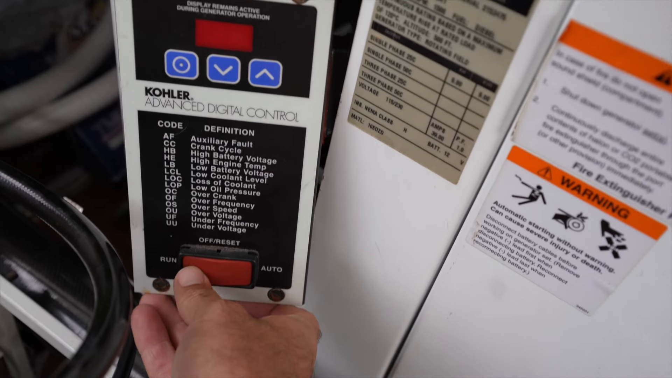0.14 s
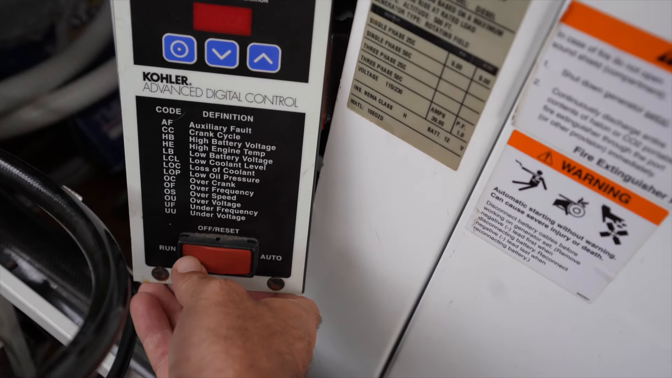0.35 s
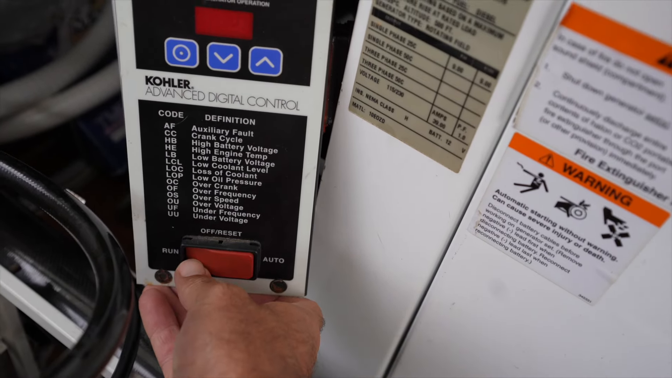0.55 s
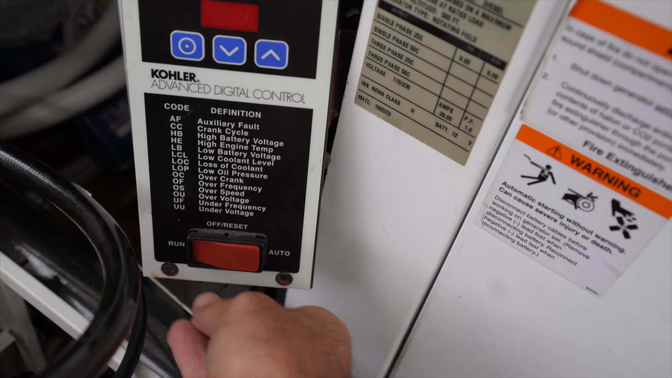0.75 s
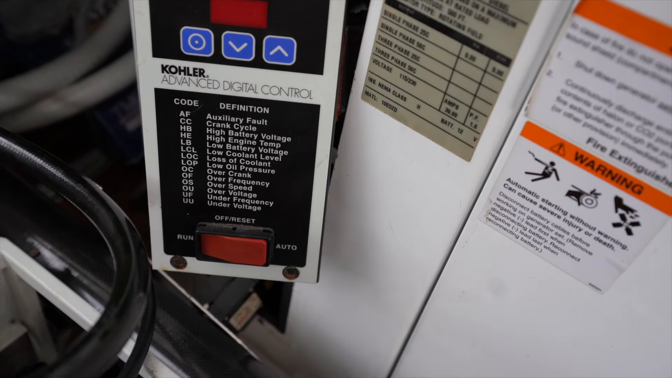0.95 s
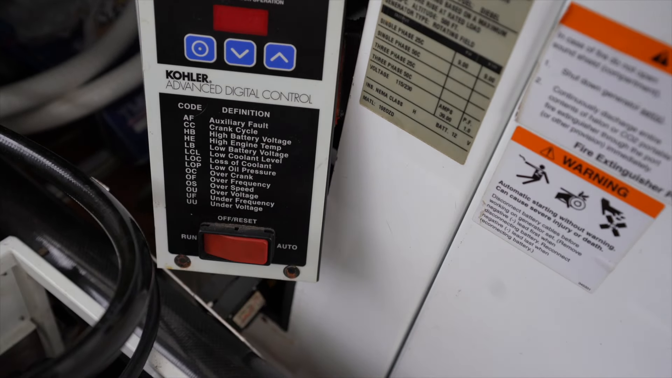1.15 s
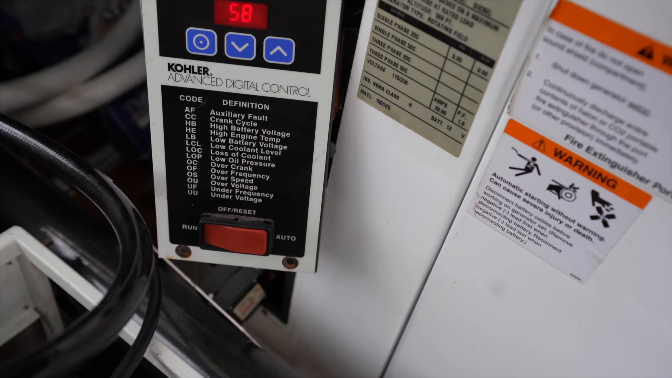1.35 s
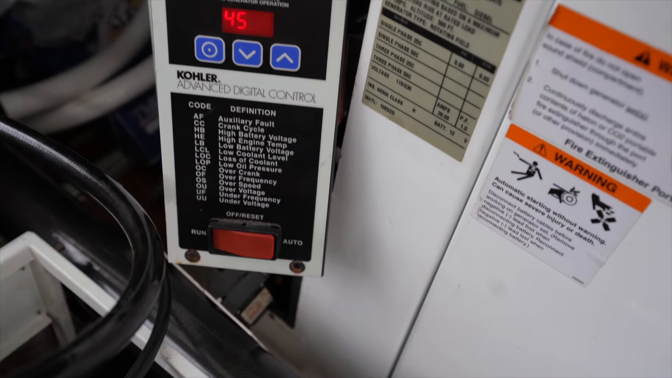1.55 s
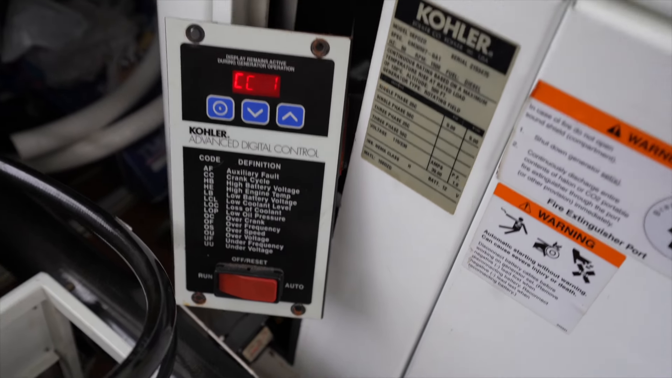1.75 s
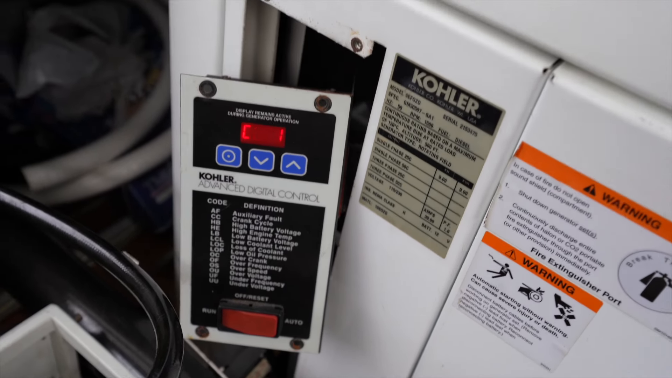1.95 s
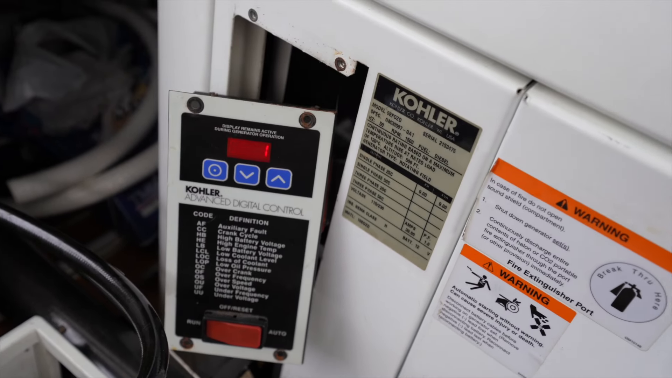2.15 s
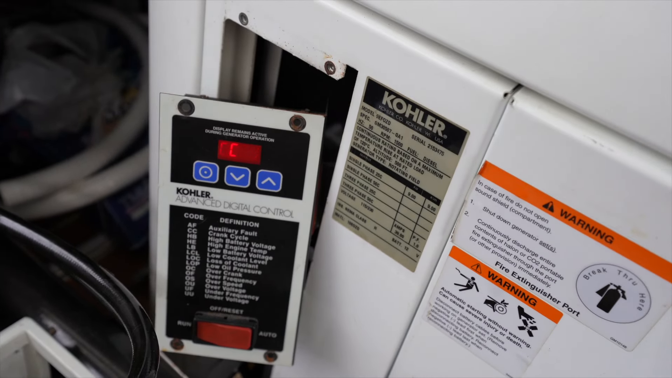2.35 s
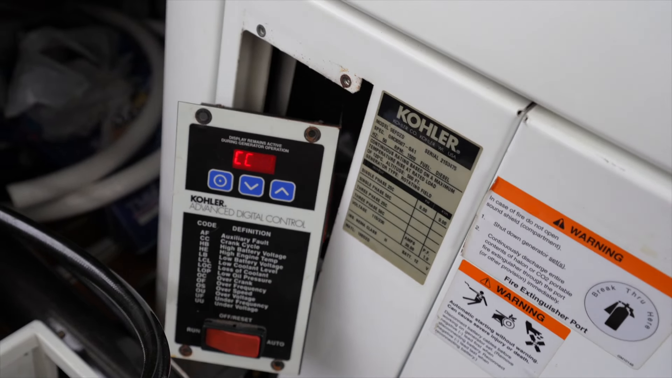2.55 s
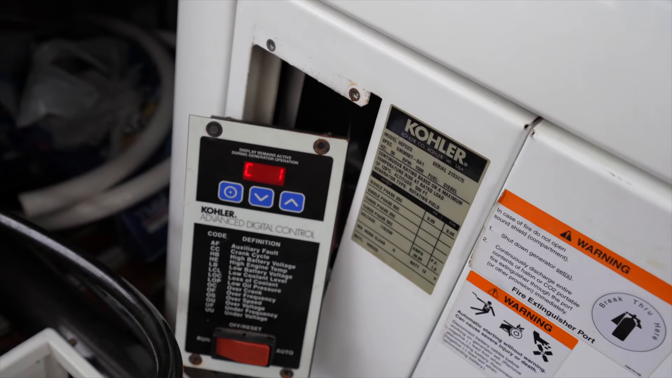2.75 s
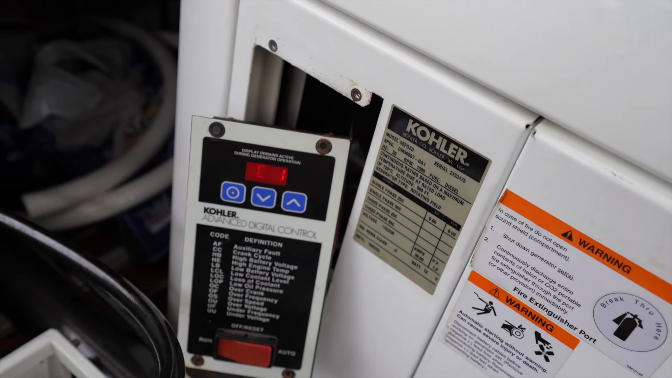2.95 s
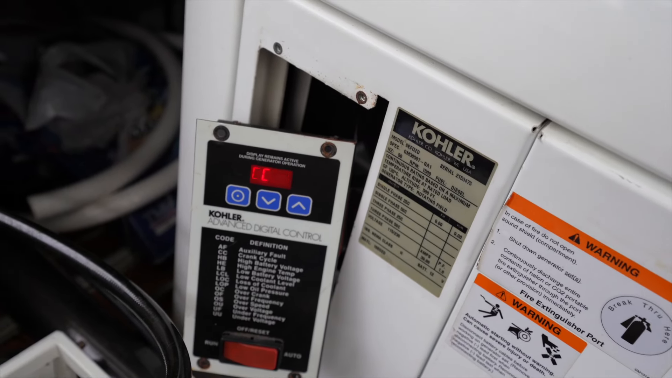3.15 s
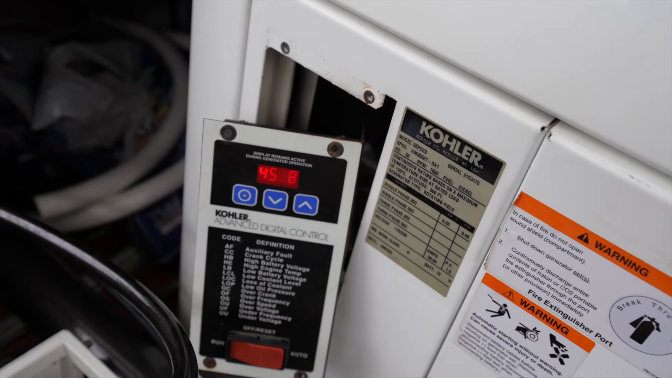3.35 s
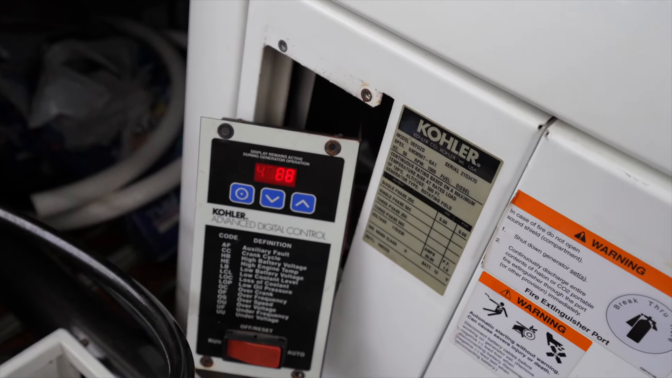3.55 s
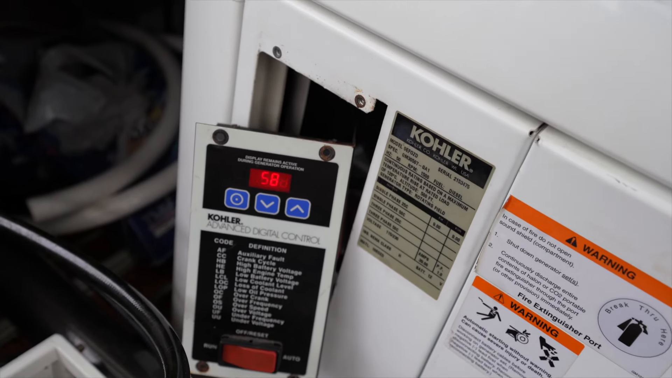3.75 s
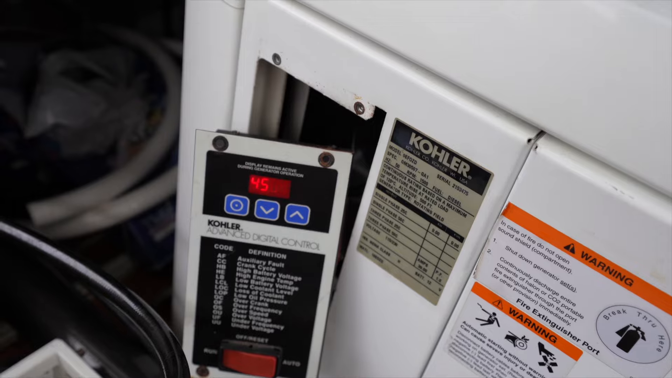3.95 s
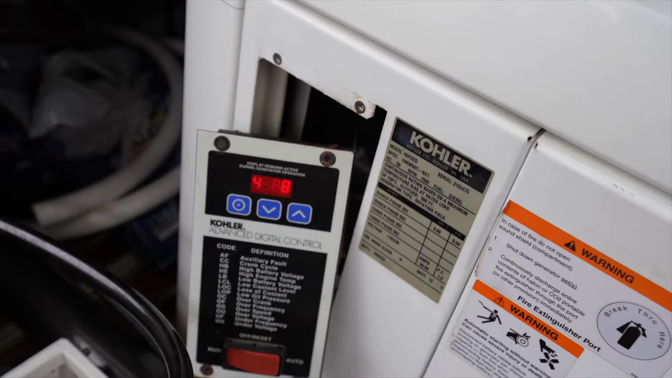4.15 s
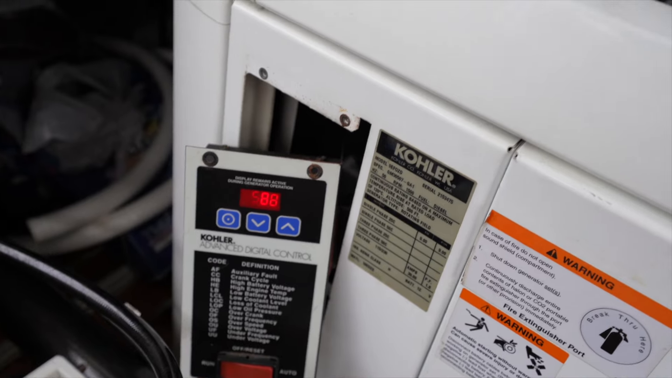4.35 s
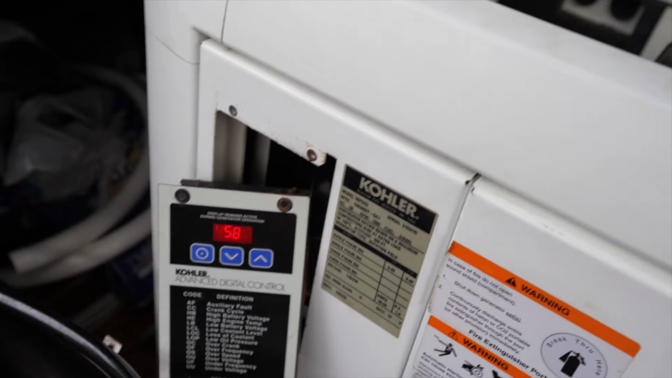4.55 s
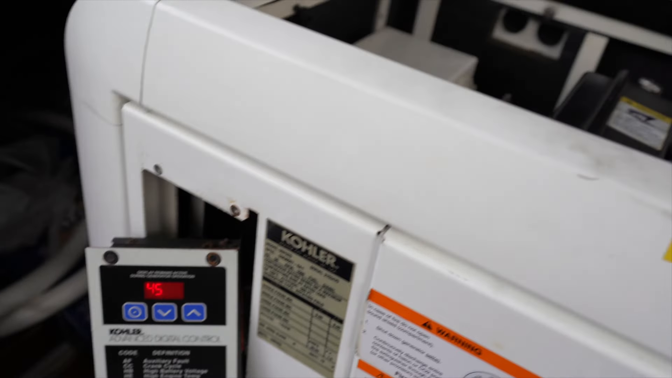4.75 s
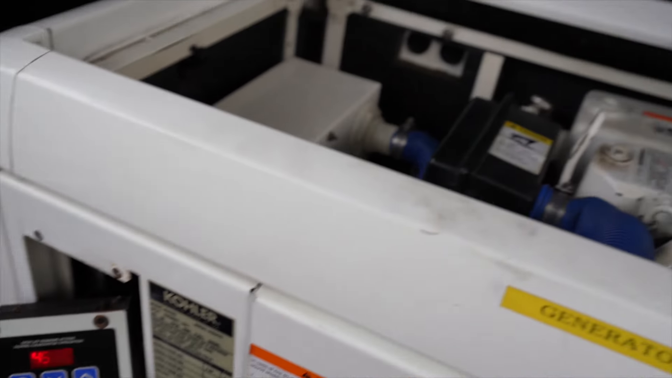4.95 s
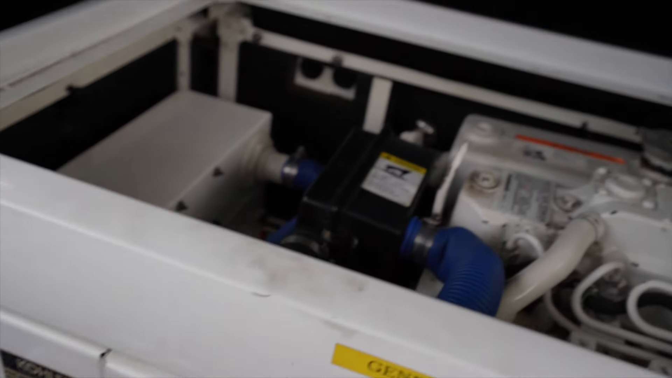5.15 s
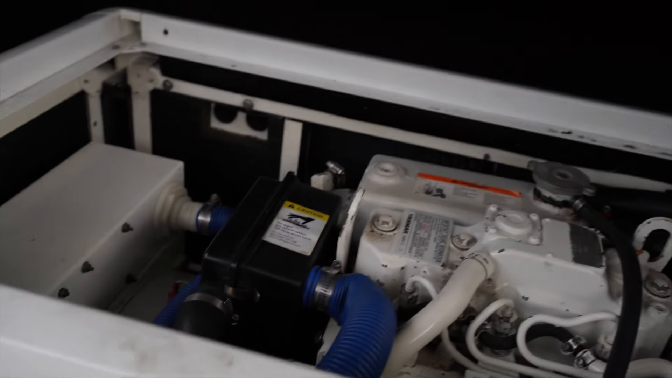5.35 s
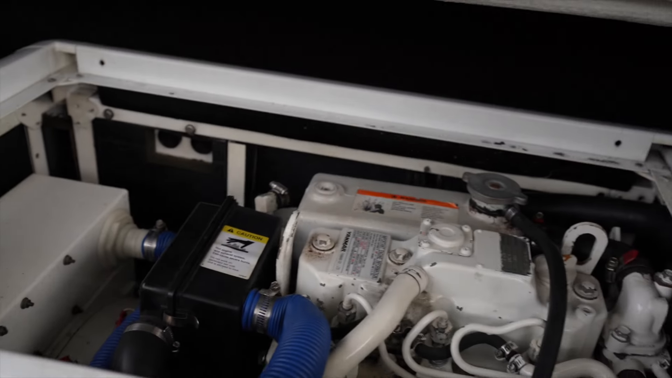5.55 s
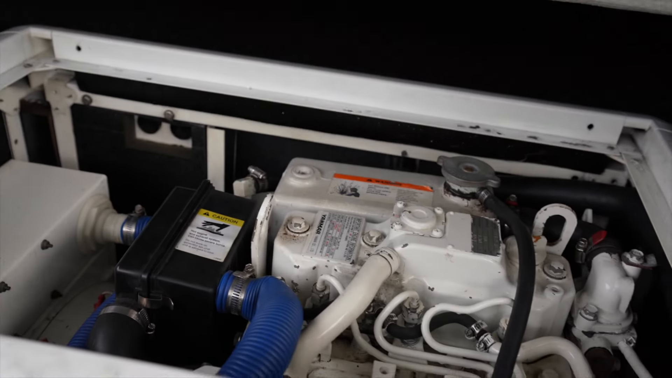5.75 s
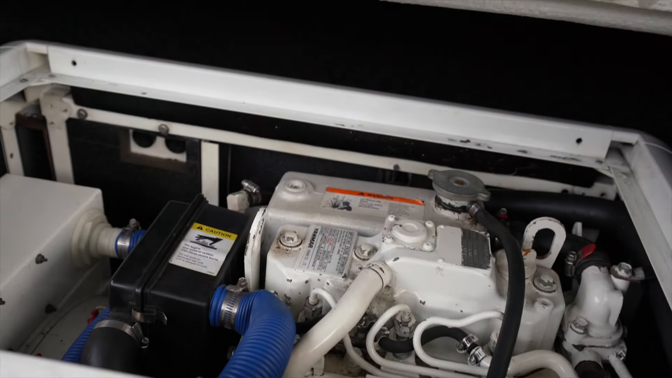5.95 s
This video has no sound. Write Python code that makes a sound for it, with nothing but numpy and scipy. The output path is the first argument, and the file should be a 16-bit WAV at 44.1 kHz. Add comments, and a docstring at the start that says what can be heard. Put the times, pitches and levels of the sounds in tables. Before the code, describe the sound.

A switch clicks in a quiet engine space, a small pump whirs, a starter clanks and grinds, and a diesel catches and runs steadily.

```python
"""A rocker switch clicks in a quiet engine space, a fuel pump hums, the starter clanks in and cranks;
a three-cylinder diesel catches, runs up and holds its speed. The microphone starts behind the panel
and moves to above the open engine; loud low pressure swings squash it. Pulses at each firing ring the
exhaust, block, heads and valves; tones and noise through resonances make the starter and pump; short
bursts make clanks and clicks; filtered noise makes the quiet of the place, with faint buzzes and rubs."""
import sys
import numpy as np
from scipy import signal
from scipy.fft import rfft, irfft
from scipy.io import wavfile
from scipy.ndimage import uniform_filter1d

SR = 44100
rng = np.random.default_rng(int(sys.argv[2]) if len(sys.argv) > 2 else 0)


def transcribe(signal):
    """Save signal, clipped to [-1, 1], as a 16-bit WAV file at the path in sys.argv[1]."""
    frames = np.atleast_2d(signal).T
    limited = np.clip(frames, -1, 1)
    pcm = np.round(limited * 32767).astype(np.int16)
    wavfile.write(sys.argv[1], SR, pcm)


N = 264600
T = np.arange(N) / SR  # [s]

# engine speed: (time [s], firing rate [firings/s])
FIRING = [(2.45, 7.04), (2.6, 11.34), (2.9, 23.05), (3.2, 32.4), (3.35, 35.47), (3.5, 40.23), (3.65, 39.11),
          (3.9, 39.24), (6.0, 39.29)]
FIRST_TURN = -.27  # firing count before the engine turns
CYCLE_HZ = 13.09  # cycles of three firings at running speed
# exhaust and hull at the 1st, 2nd, 3rd ... multiple of the cycle: level [dB]
ORDER_LEVELS = [-32, -18, 0, -10, -22, -11, -24, -24, -13, -6, -9, -5, -10, -20, -5, -11, -21, -13, -21,
                -26, -21, -22, -22, -14, -20, -26, -11, -22, -18, -17, -20, -24, -27, -12, -17, -16, -20,
                -21, -24, -28]
# exhaust, uneven while the engine catches: (time [s], level [dB])
EXHAUST_LEVEL = [(2.45, -19), (2.55, -29.5), (2.65, -17), (2.8, -25), (2.95, -14), (3.1, -18), (3.25, -17),
                 (3.5, -16.5), (6, -16.5)]
# how hard the cylinders fire: (time [s], level [dB])
HARDNESS = [(2.45, 0), (2.9, -3.5), (3.2, -1), (3.4, 0.5), (3.62, -0.5), (3.9, -0.5), (6, 0)]
MUFFLER_LAG_S, MUFFLER_FROM_HZ = 0.006115, 94.8  # the muffler's ring leaves later than the slow push
# knock colour heard behind the panel: (frequency [Hz], level [dB per Hz])
BEHIND_COLOUR = [(180, -52), (300, 0.5), (354, -1), (412, -8), (455, -6.5), (546, -8.5), (645, -1),
                 (774, -8.5), (828, -8), (1280, -14.5), (1720, -14.5), (3350, -24.5), (4300, -29),
                 (14200, -47.5), (16000, -58)]
# knock colour heard over the engine: (frequency [Hz], level [dB per Hz])
OVER_COLOUR = [(180, -14), (300, 6), (418, -8.5), (455, -5), (519, -16.5), (737, 3), (885, -10.5),
               (1280, -6), (1690, -8), (2170, -10), (3760, -20.5), (6960, -23.5), (10700, -31.5),
               (14500, -31), (16000, -36)]
# share of the knock power that repeats from cycle to cycle: (frequency [Hz], share [0-1])
REPEATS = [(300, .8), (1500, .75), (3000, .45), (5000, .12), (9000, .06)]
# blows after each firing: (delay [share of the firing gap], level [dB], t60 [s])
BLOWS = [(0, 0, 0.05), (.13, 1.5, 0.03), (0.36, 0, .05), (.72, -7, 0.099)]
# block resonances: (frequency [Hz], width [Hz], level [dB])
BLOCK = [(2430, 63, -12.5), (2700, 61, -6.5), (3650, 110, -16)]
KNOCK_DB, NEAR_DB = -20.5, 2.5  # base knock level; rise per unit of open view
# the cylinder heads ring, one row per cylinder:
# (delay [share of the firing gap], level [dB], ring [Hz], second ring [Hz])
HEADS = [(.02, -1.5, 1480, 1720), (.05, -4, 1620, 1450), (.24, -3.5, 1900, 1760)]
# sharp valve ticks: (delay [share of the firing gap], level [dB], t60 [s])
VALVES = [(0.01, 3, 0.033), (0.459, -2, 0.021)]
# the block rocks on its mounts during the start: (time [s], frequency [Hz], level [dB])
ROCKING = [(2.04, 32.4, -47), (2.46, 31.5, -37), (2.52, 30.2, -18), (2.68, 29.2, -14), (2.902, 40.5, -11.5),
           (3.1, 42, -36)]
JOLT_S, JOLT_HZ, JOLT_DB, JOLT_T60 = 2.062, 30.7, -8.5, 0.46  # the starter's bite jolts the mounts once
MOVE_START_S, MOVE_END_S = 4.57, 5.365  # the microphone swings over the engine
VIEW_BEHIND, VIEW_OVER = 0.078, 0.76  # open view of the engine, 0-1

# starter, dragged down twice by compression: (time [s], effort [dB], gear mesh [Hz],
# whine [share 0-1], overtones [dB], pinion [dB])
STARTER = [(2.03, -15, 1122, 0.4, -6, -27), (2.056, -8.5, 1170, 0.32, -5, -28),
           (2.075, -18, 1130, 0.45, -24, -39), (2.13, -17, 1360, 0.22, -18, -54),
           (2.175, -19, 1695, 0.22, -13, -44), (2.21, -15.5, 1320, 0.35, -14, -49),
           (2.235, -16.5, 965.6, 0.48, -17, -62), (2.262, -17, 956, 0.58, -21, -43),
           (2.28, -26, 967, 0.2, -6, -49), (2.33, -21, 1148, 0.44, -4, -40.5),
           (2.385, -21.5, 1326, 0.47, -2, -39), (2.418, -23, 1219, 0.4, 4, -41.5),
           (2.44, -17.5, 1078, 0.44, 4, -36.5), (2.452, -10.5, 970, 0.5, -14, -43),
           (2.476, -21.5, 778, 0.28, 9, -44), (2.62, -47, 695, 0, -3, -65)]
# starter grind colour: (frequency [Hz], level [dB per Hz])
STARTER_COLOUR = [(59, -17), (100, -7.5), (193, -11.5), (315, -11), (513, -10.5), (691, -13.5), (768, -1),
                  (970, -1), (1450, -12.5), (2630, -17), (3470, -27.5), (6290, -40), (16000, -57)]
# starter housing resonances: (frequency [Hz], width of each pass [Hz], level [dB])
HOUSING = [(199.3, 6, 1.5), (461.4, 18, 1), (528, 35, 4.5), (790, 33, 5.5), (988, 79, 7), (1150, 17, 7.5),
           (1663, 33, 0.5), (1910, 26, -4.5), (2460, 83, -20), (2660, 140, 1.5)]
# tones of the gear train: (frequency [multiple of the mesh], level [dB], width of each pass [Hz])
GEAR_TONES = [(.2, 0.5, 11), (.5, -13, 60), (1, 10, 70)]
# overtone of the mesh: (frequency [multiple of the mesh], level [dB], width of each pass [Hz])
OVERTONES = [(2, 6, 220)]
# the pinion and its shaft sing in the treble: (frequency [Hz], level [dB])
PINION = [(4520, 4), (4900, 0), (6330, 1), (8030, -8), (11300, -12)]
# hiss around the pinion's song: (frequency [Hz], level [dB per Hz])
PINION_HISS = [(3000, -27), (4200, -3), (8500, -6), (9500, -19), (12000, -15), (16000, -32)]

# the starter pinion bites and slaps: (time [s], peak of the hit [dB])
CLANKS = [(2.034, -4), (2.042, -12), (2.052, -12.5), (2.087, -16.5), (2.441, -18)]
# colour of the hits: (frequency [Hz], level [dB per Hz])
CLANK_COLOUR = [(180, -78), (300, -0.5), (1120, -5.5), (1430, -31), (1660, -7), (2030, -10.5), (2480, -7.5),
                (2930, -14), (7690, -28), (16000, -46.5)]
CLANK_TREBLE_DB, CLANK_THUMP_DB, CLANK_T60 = -9, -24.5, 0.087
# hard early firings and bright clacks between them:
# (time [s], peak of the hit [dB], treble [dB], thump [dB], t60 [s])
COUGHS_AND_CLACKS = [(2.487, -19, 15, -20.5, 0.045), (2.593, -10, -42, -13, 0.15),
                     (2.64, -9.5, -1, -19, 0.055), (2.674, -13.5, -17, -6.5, 0.15),
                     (2.703, -13.5, -2, -9, 0.086), (2.793, -8.5, 1, -13, 0.03),
                     (2.847, -11.5, -12, -9, 0.29), (2.894, -11.5, -20, -11.5, 0.17),
                     (2.928, -19, -13, -10, 0.1), (2.972, -15.5, -3, -17.5, 0.19),
                     (3.012, -14, -2, -8.5, 0.094), (3.046, -11.5, -15, -29, 0.2),
                     (3.082, -13, 0, -23, 0.12), (3.152, -9.5, -5, -13, 0.048),
                     (3.18, -5.5, -5, -15.5, 0.094)]
DULL_HZ, SHARP_HZ = 1000, 1940
SHARP_FROM_DB = -5  # hits with more treble than this ring the higher mode
# thump of the muffler and hull: (frequency [Hz], level [dB], t60 [s])
THUMP = [(157.4, 6.5, 0.16), (214, 3.5, 0.054), (362, -13.5, 0.47), (620, -16, 0.058)]

# switch and relay clicks: (time [s], peak [dB], thud before peak scaling [dB], thud [Hz])
CLICKS = [(0, -32, -9, 400), (0.34, -53, -1, 320), (0.428, -8, -31, 200), (0.641, -30, -11, 200),
          (0.707, -47.5, 5, 550), (1.513, -35, -7, 200)]
# panel modes, detuned a little at each click: (frequency [Hz], level [dB], t60 [s])
PANEL = [(1663, 12.5, 0.035), (3030, 2.5, 0.072), (3740, -6, 0.094), (6330, -14, 0.045),
         (7650, -1.5, 0.049), (8000, -1, 0.04), (9230, 7.5, 0.019)]

# the fuel pump races, then takes up its load: (time [s], speed [turns/s])
PUMP_SPEED = [(1.46, 50), (1.53, 73), (1.575, 90), (1.62, 91), (1.68, 82.8), (2.05, 80.6)]
# pump: (time [s], level [dB])
PUMP_LEVEL = [(1.46, -75), (1.53, -59), (1.6, -56), (1.69, -52.5), (1.95, -53), (2.05, -45)]
# pump colour: (frequency [Hz], level [dB per Hz])
PUMP_COLOUR = [(120, -16), (230, -0.5), (494, -10.5), (683, -5.5), (1070, -3.5), (1240, -19), (1540, -9),
               (1850, -20), (2350, -10), (2700, -17), (3050, -14), (3350, -21), (3750, -19), (4640, -19),
               (10100, -24.5), (11900, -26), (15000, -26)]
# vane tones: (frequency [multiple of the turn], level [dB])
VANES = [(5, -15), (7, -10), (8, -6), (10, -27), (13, -15)]
# low vane tones swell and then hush: time of the top [s], levels [dB], slopes [dB/s]
PRIME_S, PRIME_DB, PRIMED_DB, PRIME_RISE, PRIME_FALL = 1.605, 13, -18, 260, 450

# colour of the quiet place: (frequency [Hz], level [dB per Hz])
QUIET_COLOUR = [(7.1, -30.5), (12, 10.5), (34, -13.5), (69, -41), (197, -28), (300, -41), (1280, -48.5),
                (2400, -49), (6110, -58.5), (14600, -65), (16000, -75)]
QUIET_DB, HUM_HZ, HUM_DB = -47, 75.4, -61
# runs of faint buzzes close to the microphone: (time [s], buzzes [count], level [dB],
# change [dB per buzz], length [s], buzz [Hz], bright band [Hz], slide [Hz per buzz])
RUNS = [(.165, 2, -71, -2, .06, 340, 0, 0), (.645, 6, -62, -2.2, .09, 289, 3900, -450),
        (1.82, 2, -61, -3, .075, 289, 4900, 0)]
BUZZ_GAP_S, BUZZ_ROUGH = .0995, 1.8  # between buzz starts; noise against tone
# rubs: (time [s], level [dB], buzz [Hz], bright band [Hz], roughness [noise against tone])
RUBS = [(.348, -60, 147.6, 3000, 9), (1.265, -61, 115.5, 1000, 5)]
RUB_S = 0.05
# what the buzzes and rubs ring with, detuned a little each time: (frequency [Hz], level [dB])
BUZZ_MODES = [(680, 3), (855, 7), (1450, 3), (1930, -2), (2200, -3), (2500, -3), (2930, -4), (3390, 5),
              (4350, -9), (4650, -17)]
EDGE_HZ = 16100  # upper band limit


def engine():
    """Firing pulses drive the exhaust and knock, while the block rocks on its mounts as it starts."""
    turns = crank()
    (exhaust_db,), _ = columns(EXHAUST_LEVEL)
    (hard_db,), _ = columns(HARDNESS)
    swing = np.clip((T - MOVE_START_S) / (MOVE_END_S - MOVE_START_S), 0, 1)
    view = VIEW_BEHIND + (VIEW_OVER - VIEW_BEHIND) * np.sin(np.pi / 2 * swing) ** 2
    knock_db = KNOCK_DB + 0.57 * hard_db + NEAR_DB * view
    sound = amp(exhaust_db) * exhaust(turns, view)
    sound += amp(knock_db) * knock(turns, view, hard_db)
    return sound + rocking()


def crank():
    """The firing rate adds up to a running count of firings since the first one."""
    (rate,), on = columns(FIRING)
    return FIRST_TURN + np.cumsum(rate * on) / SR


def pulses(turns, delay, spread_db):
    """One pulse per firing at a given share of the gap, one row for each cylinder."""
    whole = np.floor(turns - delay)
    at = np.flatnonzero((np.diff(whole) > 0) & (whole[1:] >= 0))
    cylinder = whole[at + 1].astype(int) % 3
    out = np.zeros((3, N))
    out[cylinder, at] = amp(spread_db * rng.standard_normal(len(at)))
    return out


def exhaust(turns, view):
    """Like puffs ring the firing orders; the difference between cylinders rings the orders in between."""
    order, db = np.arange(len(ORDER_LEVELS)) + 1, np.array(ORDER_LEVELS)
    firing = order % 3 == 0
    top = [(800, -50), (2000, -90)]
    even_curve = [(15, -31), (28, -10), *zip(order[firing] * CYCLE_HZ, db[firing]), *top]
    uneven_curve = [*zip(order[~firing] * CYCLE_HZ, db[~firing]), *top]
    puffs = pulses(turns, 0, 1.0)
    lope = colour(puffs.T @ [1, -.5, -.5], uneven_curve)
    # the hull passes each pitch on after its own delay, which spreads the lope over the cycle
    hz = np.fft.rfftfreq(2 * N, 1 / SR)
    hull_delay = .032 * (1 - np.cos(2 * np.pi * hz / 190))
    lope = delay_pitches(rfft(lope, 2 * N), hull_delay, hz)
    sound = evened(colour(puffs.sum(0), even_curve)) + amp(-4.0) * evened(lope)
    # the upper orders come through the panel late and scattered, and fade over the open engine
    upper = rfft(sound, 2 * N) * np.clip((hz - 230) / 40, 0, 1)
    late = delay_pitches(upper, hull_delay / 2, hz)
    sound = sound - irfft(upper)[:N] + amp(-5 * view) * late
    muffler_lag = MUFFLER_LAG_S * np.clip((hz - MUFFLER_FROM_HZ) / 30, 0, 1)
    sound = delay_pitches(rfft(sound, 2 * N), muffler_lag, hz)
    # the puff reaches the outlet a moment after the firing
    return np.pad(sound, (round(0.00415 * SR), 0))[:N]


def delay_pitches(spectrum, delay, hz):
    """Each pitch travels for its own time: phase is the running sum of delay over frequency."""
    return irfft(spectrum * np.exp(-2j * np.pi * np.cumsum(delay) * hz[1]))[:N]


def knock(turns, view, hard_db):
    """Blows shake the block alike every cycle, partly alike in all cylinders; fresh rattle rides on top."""
    t = np.arange(5000) / SR
    view = np.clip(view, 0, 1)
    same, power = np.zeros(N), np.zeros(N)
    for delay, db, t60 in BLOWS:
        shape = amp(db - 60 * t / t60) * np.minimum(t / 0.001, 1)
        common = rng.standard_normal(len(t))
        for train in pulses(turns, delay, 1.0):
            own = rng.standard_normal(len(t))
            same += signal.oaconvolve(train, shape * (common + 1.5 * own))[:N]
            power += signal.oaconvolve(train ** 2, shape ** 2)[:N]
    wash = amp(-9 - 18 * view - hard_db) * (turns > 0)  # behind the panel the echoes fill the gaps
    fresh = np.sqrt(abs(power) + wash ** 2) * rng.standard_normal(N)
    share = np.clip(read(REPEATS, np.fft.rfftfreq(N, 1 / SR)), 0, 1)
    spectrum = np.sqrt(share) * rfft(evened(same)) + np.sqrt(1 - share) * rfft(evened(fresh))
    drive = irfft(spectrum, N)
    body = (1 - view) * colour(drive, BEHIND_COLOUR, size=4096)
    body += view * colour(drive, OVER_COLOUR, size=4096)
    body += sum(amp(db + 4 * view) * resonate(drive, hz, width) for hz, width, db in BLOCK)
    body += amp(-14.5 + 7 * view + 1.3 * hard_db) * heads(turns)
    return body + amp(-31.5 + 16 * view + hard_db) * valves(turns)


def heads(turns):
    """Each cylinder's firing strikes its head, which rings briefly in two decaying metallic tones."""
    t = np.arange(1500) / SR
    shape = amp(-60 * t / .025) * np.minimum(t / .001, 1)
    out = np.zeros(N)
    for cylinder, (delay, db, hz, second_hz) in enumerate(HEADS):
        tones = np.sin(2 * np.pi * hz * t) + 0.81 * np.sin(2 * np.pi * second_hz * t)
        train = pulses(turns, delay, 2.4)[cylinder]
        out += signal.oaconvolve(train, amp(db) * shape * tones)[:N]
    return evened(out)


def valves(turns):
    """Two bright ticks in every firing gap, each a decaying burst of noise."""
    t = np.arange(2000) / SR
    envelope = np.zeros(N)
    for delay, db, t60 in VALVES:
        train = pulses(turns, delay, 3.9).sum(0)
        power = signal.oaconvolve(train ** 2, amp(db - 60 * t / t60) ** 2)[:N]
        envelope += np.sqrt(abs(power))
    tick_colour = [(1000, -31), (2600, 2), (7000, -3.5), (16000, -13.5)]
    return evened(colour(envelope * rng.standard_normal(N), tick_colour, size=512))


def rocking():
    """The block sways on its mounts at a low pitch and its octave, with one decaying jolt."""
    (hz, db), on = columns(ROCKING)
    angle = 2 * np.pi * np.cumsum(hz) / SR
    sway = 0.84 * np.sin(angle) + 0.24 * np.sin(2 * angle)
    rock = np.sqrt(2) * amp(db) * uniform_filter1d(on * 1., 900) * sway
    t = T[:SR]
    add(rock, JOLT_S, -amp(JOLT_DB - 60 * t / JOLT_T60) * np.sin(2 * np.pi * JOLT_HZ * t))
    return rock


def starter():
    """Gear teeth whine with motor speed and grind through the ringing housing; the pinion sings above."""
    (db, hz, whine, over_db, treble_db), on = columns(STARTER)
    whine = np.clip(whine, 0, 1)
    noise = rng.standard_normal((3, N))
    swell = 1 + 0.58 / (1 + ((hz - 958) / 60) ** 2)  # the mesh swells as it crosses the main ring
    teeth = swell * mesh(hz, GEAR_TONES, noise[0])
    teeth += amp(over_db) * mesh(hz, OVERTONES, noise[0])
    ring = sum(amp(d) * evened(resonate(resonate(noise[1], f, w), f, w)) for f, w, d in HOUSING)
    grind = amp(-1.5) * evened(ring) + evened(colour(noise[0], STARTER_COLOUR, size=2048))
    sing = sum(amp(d) * evened(resonate(noise[2], f, 110)) for f, d in PINION)
    sing = evened(sing) + 0.87 * colour(noise[1], PINION_HISS, size=1024)
    sound = amp(db) * (whine * evened(teeth) + (1 - whine) * evened(grind))
    sound += amp(treble_db) * evened(sing)
    return uniform_filter1d(on * 1., 200) * sound


def mesh(hz, tones, noise):
    """Meshing teeth give tones that follow the speed, each a faint line in a rough halo."""
    angle = 2 * np.pi * np.cumsum(hz) / SR
    out = np.zeros(N)
    for k, db, width in tones:
        halo = evened(resonate(resonate(noise, k * hz, width), k * hz, width))
        out += amp(db) * (np.sin(k * angle) + 1.3 * halo)
    return out


def clanks():
    """Pinion blows, hard early firings and bright clacks: noise rings the casting over a low thump."""
    out, t = np.zeros(N), np.arange(9000) / SR
    thump = sum(amp(d - 60 * t / t60) * np.sin(2 * np.pi * f * t) for f, d, t60 in THUMP)
    thump *= np.minimum(t / 0.0058, 1)
    bites = [(*row, CLANK_TREBLE_DB, CLANK_THUMP_DB, CLANK_T60) for row in CLANKS]
    for s, db, treble_db, thump_db, t60 in bites + COUGHS_AND_CLACKS:
        hz = SHARP_HZ if treble_db > SHARP_FROM_DB else DULL_HZ
        burst = rng.standard_normal(len(t)) * amp(-60 * t / t60) * np.minimum(t / 0.0004, 1)
        ring = resonate(burst, hz, 99)
        block = sum(resonate(burst, f, 2 * w) for f, w, _ in BLOCK)  # the block rattles along
        rattle = resonate(burst, 5700, 3900) / 2 + 2 * block
        hit = colour(burst, CLANK_COLOUR, size=1024) + .5 * ring / abs(ring).max()
        hit += amp(treble_db) * rattle + amp(thump_db + 8) * resonate(burst, 590, 300)
        add(out, s, amp(db) * hit / abs(hit).max() + amp(thump_db) * thump)
    return out


def clicks():
    """A snap rings the thin panel, thuds, and dies in the small space."""
    out, t = np.zeros(N), np.arange(9000) / SR
    snap_colour = [(300, -11.0), (1000, 0.5), (4000, 4.5), (9000, -12.0), (15000, -13.5)]
    for s, db, thud_db, thud_hz in CLICKS:
        ring = np.zeros(len(t))
        for f, d, t60 in PANEL:
            ring += amp(d - 60 * t / t60) * np.sin(2 * np.pi * f * rng.uniform(0.92, 1.03) * t)
        # a short snap with a faint longer tail
        snap = rng.standard_normal(len(t)) * (amp(-60 * t / 0.019) + amp(-24 - 60 * t / 0.13))
        thud = amp(thud_db - 60 * t / 0.054) * np.sin(2 * np.pi * thud_hz * t)
        hit = .5 * ring / abs(ring).max() + 0.53 * colour(snap, snap_colour, size=512) + thud
        add(out, s, amp(db) * hit / abs(hit).max())
    return out


def pump():
    """A small motor buzzes over whirring noise; its vanes sing at multiples of the turn."""
    (hz,), on = columns(PUMP_SPEED)
    (db,), _ = columns(PUMP_LEVEL)
    slope_db = np.maximum(PRIME_RISE * (PRIME_S - T), PRIME_FALL * (T - PRIME_S))
    prime_db = np.maximum(PRIME_DB - slope_db, PRIMED_DB)
    hz = hz[on]
    drive = .6 * buzz(hz, .004) + .6 * buzz(2 * hz, .004) + 1.1 * rng.standard_normal(len(hz))
    vanes = np.zeros(len(hz))
    for k, d in VANES:
        vanes += amp(d) * evened(resonate(rng.standard_normal(len(hz)), k * hz, 5))
    angle = 2 * np.pi * np.cumsum(hz) / SR
    priming = amp(prime_db[on]) * (np.sin(4 * angle) + 0.48 * np.sin(6 * angle))  # tones at 4 and 6 per turn
    out = np.zeros(N)
    out[on] = amp(db[on]) * (evened(colour(drive, PUMP_COLOUR, size=2048)) + vanes + priming)
    return out


def buzz(hz, waver):
    """Overtones of a small motor in scattered phase, its speed wavering a little."""
    drift = evened(uniform_filter1d(rng.standard_normal(len(hz)), 900))
    turns = np.cumsum(hz * (1 + waver * drift)) / SR
    overtones = range(1, int(5000 / hz.max()))
    return evened(sum(np.cos(2 * np.pi * (k * turns + rng.random())) for k in overtones))


def quiet():
    """Low lumpy rumble and hiss as coloured noise, a distant hum, faint buzzes and rubs."""
    out = amp(QUIET_DB) * colour(rng.standard_normal(N), QUIET_COLOUR)
    out += amp(HUM_DB) * evened(resonate(rng.standard_normal(N), HUM_HZ, 7.1))
    for s, count, db, fade_db, length, buzz_hz, hz, slide in RUNS:
        for k in range(round(count)):
            sound = whirr(length, db + k * fade_db, buzz_hz, hz + k * slide, BUZZ_ROUGH)
            add(out, s + k * BUZZ_GAP_S, sound)
    for s, *rub in RUBS:
        add(out, s, whirr(RUB_S, *rub))
    return out


def whirr(length, db, buzz_hz, hz, rough):
    """A small buzz with noise rings a set of modes, those near the bright band most."""
    noise = rng.standard_normal(round(length * SR))
    drive = evened(buzz(buzz_hz * np.linspace(.98, 1.02, len(noise)), 0.01) + rough * noise)
    ring = np.zeros(len(noise))
    for f, d in BUZZ_MODES:
        mode_db = max(d - 5 * abs(f - hz) / 1000, -30)
        ring += amp(mode_db) * evened(resonate(drive, f * rng.uniform(.96, 1.04), 25 + 30 * rough))
    body_colour = [(400, -2.0), (850, -5.0), (2000, -7), (4500, -11), (5500, -33)]
    sound = evened(ring) + 0.35 * colour(drive, body_colour, size=512)
    return amp(db) * sound * signal.windows.tukey(len(noise), .85)


def amp(db):
    """Level in dB to amplitude."""
    return 10 ** (np.asarray(db) / 20)


def evened(x):
    """Scales a sound to an RMS of one."""
    return x / np.sqrt(np.mean(x ** 2) + 1e-20)


def read(points, hz):
    """Reads a curve at the given frequencies, straight between points on a log frequency axis."""
    f, value = np.transpose(points)
    return np.interp(np.log(hz + 1), np.log(f + 1), value)


def columns(rows):
    """Timed rows as one curve per column, and where the table's span of time lies."""
    s, *rest = np.transpose(rows)
    return [np.interp(T, s, c) for c in rest], (T >= s[0]) & (T <= s[-1])


def add(mix, s, sound):
    """Lays a sound into the mix from s seconds on."""
    part = mix[round(s * SR):][:len(sound)]
    part += sound[:len(part)]


def colour(x, points, size=16384):
    """Causal filter with the given dB curve: the phase follows from the log gain."""
    log_gain = read(points, abs(np.fft.fftfreq(size, 1 / SR))) * np.log(10) / 20
    taps = np.fft.ifft(np.exp(np.conj(signal.hilbert(log_gain)))).real
    return signal.oaconvolve(x, taps[:size // 2] / np.linalg.norm(taps))[:len(x)]


def resonate(x, hz, width):
    """A resonance that may glide: shifts the pitch hz down to zero, smooths, and shifts back."""
    turn = np.exp(2j * np.pi * np.cumsum(hz * np.ones(len(x))) / SR)
    r = np.exp(-np.pi * width / SR)
    return 2 * (turn * signal.lfilter([1 - r], [1, -r], x / turn)).real


def scene():
    """All sources summed at the one microphone."""
    return (engine() + starter() + clanks() + clicks() + pump() + quiet())[None]


def record(dry):
    """The microphone flattens large swings, negative ones sooner; then the band limit."""
    limit, knee = np.where(dry > 0, 1.1, .68), 4.0
    squashed = dry / (1 + abs(dry / limit) ** knee) ** (1 / knee)
    low_pass = signal.firwin(1501, EDGE_HZ, window=("kaiser", 9), fs=SR)
    return signal.oaconvolve(squashed, low_pass[None], "same")


dry = scene()
out = record(dry)
transcribe(out)
```